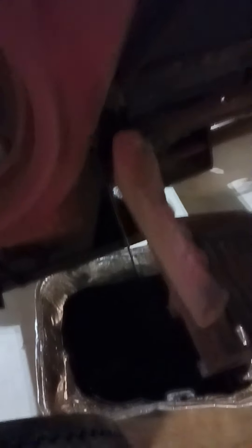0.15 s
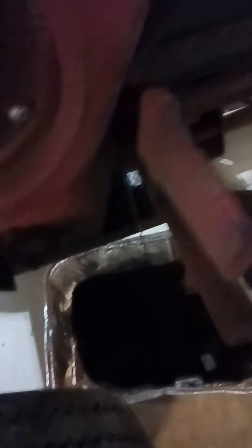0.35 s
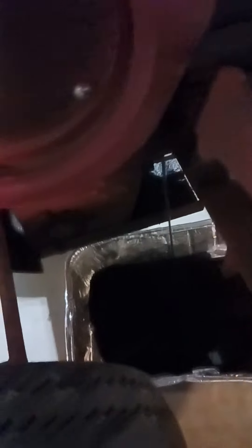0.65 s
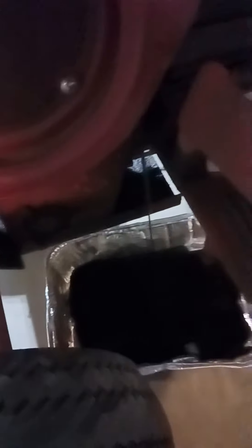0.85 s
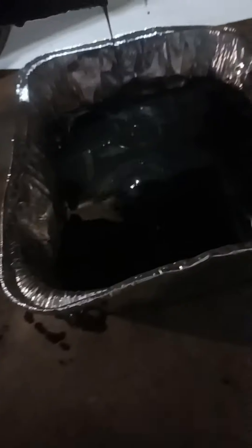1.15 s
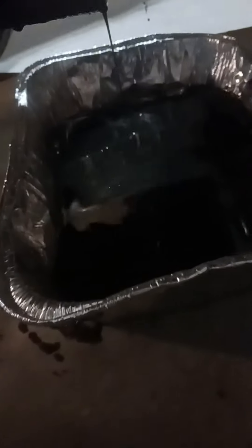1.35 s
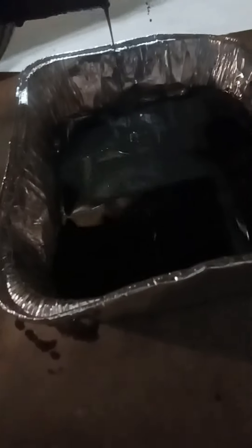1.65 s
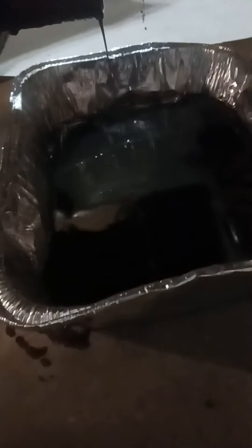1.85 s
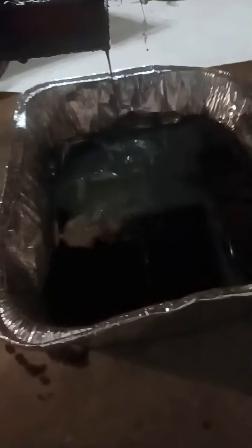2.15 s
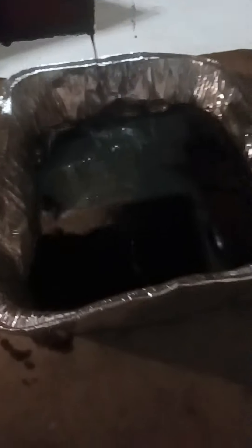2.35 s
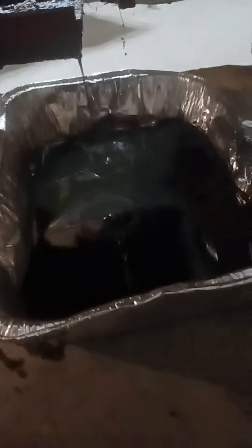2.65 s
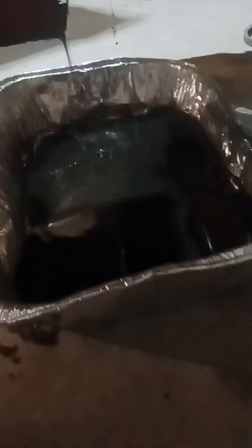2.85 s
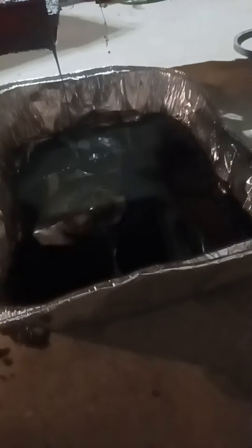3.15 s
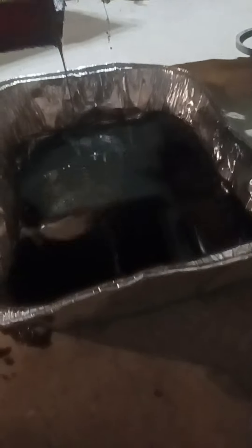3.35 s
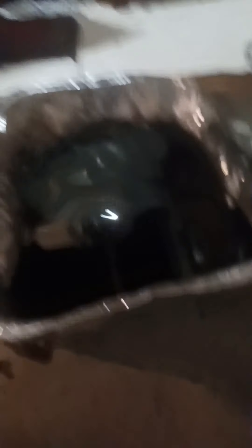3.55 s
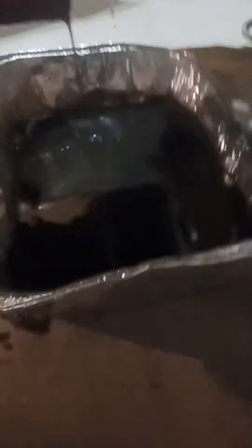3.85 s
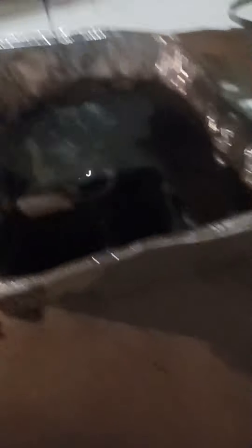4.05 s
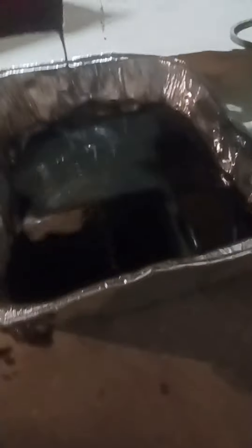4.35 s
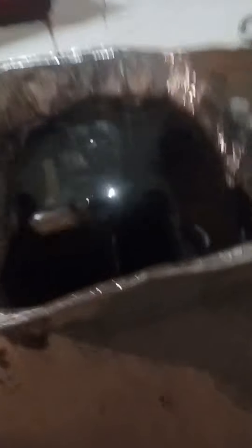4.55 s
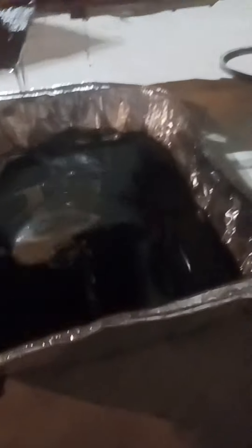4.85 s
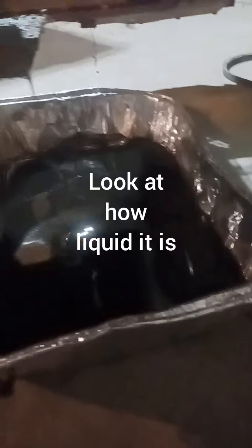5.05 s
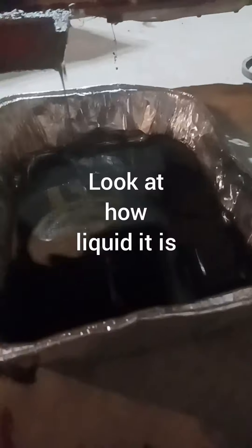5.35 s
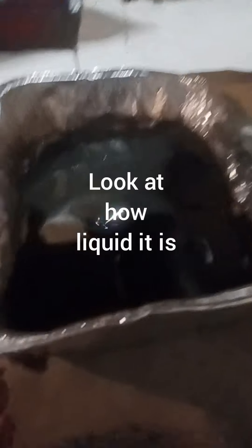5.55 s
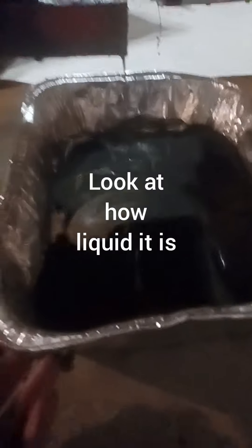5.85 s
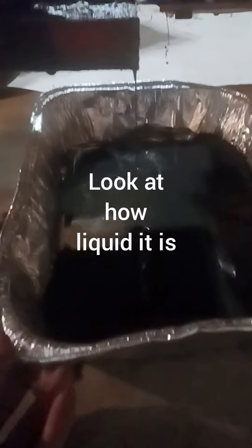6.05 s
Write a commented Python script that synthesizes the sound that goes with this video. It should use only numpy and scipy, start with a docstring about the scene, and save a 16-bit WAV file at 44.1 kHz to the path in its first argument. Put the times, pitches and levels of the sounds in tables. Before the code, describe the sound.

Still room air with blurred drips and finger knocks lasts about a second and cuts to silence. Then a thin oil stream patters into a shallow metal pan, close and fairly dry, with irregular plops, tiny whistling bubbles, snapping films and brief gurgles. Muffled engines drone outside, the second sinking lower. Grainy cloth rustles and dull thumps interrupt mostly around the middle.

```python
"""A quieter first second, farther from the pan: still air, blurred plops, knocks and taps; then a short silence.
Then engine oil trickles from a car into a foil pan on a garage floor: noise and bubbles ring pan resonances.
Plops, chirps and gurgles are rising-pitch bubbles; bursting films are noise cracks with a very high ring.
Two far engines hum through the walls in turn, as sums of shaft orders, over a filtered-noise rumble.
From 1.6 s a hand and sleeve rub close to the microphone: grainy noise shaped stroke by stroke."""
import sys
import numpy as np
from scipy import signal
from scipy.fft import rfft, irfft, next_fast_len
from scipy.io import wavfile
from scipy.ndimage import uniform_filter1d, map_coordinates

SR = 44100
rng = np.random.default_rng(int(sys.argv[2]) if len(sys.argv) > 2 else 0)


def file_out(sig):
    """Save sig as 16-bit WAV at sys.argv[1]."""
    # one column per channel
    cols = np.atleast_2d(sig).T
    # limit, then scale
    lim = np.clip(cols, -1, 1)
    pcm = np.round(lim * 32767).astype(np.int16)
    wavfile.write(sys.argv[1], SR, pcm)


N = 274302  # samples


def amp(db):
    """Decibels to gain."""
    return 10 ** (np.asarray(db) / 20)


def unit(x):
    """Scale to rms 1."""
    return x / np.sqrt(np.mean(x ** 2) + 1e-20)


def crest(x):
    """Scale to peak 1."""
    return x / np.abs(x).max()


def along(points, hz):
    """Interpolate (Hz, value) points on a log frequency axis."""
    f, v = np.transpose(points)
    return np.interp(np.log(hz + 1), np.log(f + 1), v)


def clock():
    """Time axis of the whole sound, s."""
    return np.arange(N) / SR


def moment():
    """Time axis of one short event, s."""
    return np.arange(SR // 6) / SR


def curve(rows):
    """(s, value) breakpoints to one value per sample."""
    s, value = np.transpose(rows)
    return np.interp(clock(), s, value)


def wobble(knots_per_s):
    """Smooth random curve through normal-distributed knots."""
    return map_coordinates(rng.standard_normal(4096), [np.arange(N) * knots_per_s / SR], mode="wrap")


def filtered(x, response):
    """Apply a complex frequency response, zero-padded."""
    m = next_fast_len(len(x) + 4096)
    spectrum = rfft(x, m) * response(np.fft.rfftfreq(m, 1 / SR))
    return irfft(spectrum, m)[:len(x)]


def coloured(x, spectrum):
    """Filter x by a (Hz, dB) spectrum."""
    return filtered(x, lambda hz: amp(along(spectrum, hz)))


def noise(spectrum):
    """Coloured noise of rms 1."""
    return unit(coloured(rng.standard_normal(N), spectrum))


def burst(t60_s):
    """White noise with exponential decay."""
    t = moment()
    return rng.standard_normal(len(t)) * amp(-60 * t / t60_s)


def add(track, s, sound):
    """Mix a sound in at time s."""
    room = track[max(round(s * SR), 0):][:len(sound)]
    room += sound[:len(room)]


# room and microphone hiss: f/Hz, relative level/dB
AIR_SPECTRUM = [(25, -11), (80, 2.5), (130, -8.5), (380, -24), (530, -12), (730, -7.5), (900, -23),
                (1250, -15), (1500, -26), (4600, -31), (5300, -11.5), (6100, -28.5), (11000, -36),
                (13000, -25.5)]


def air():
    """Steady coloured noise of the still room and the microphone."""
    return amp(-71) * noise(AIR_SPECTRUM)


# resonances of the foil pan with its pool: f/Hz, width/Hz, level/dB
PAN_MODES = [(1082, 90, -4.5), (1628, 42, -4), (1864, 750, -21.5), (2222, 30, 3.5), (2421, 20, -2.5),
             (2830, 160, -3.5), (5190, 780, -16)]


def pan(x):
    """Ring the pan: parallel second-order resonances of alternating sign."""
    def response(f):
        total = 0
        for k, (centre_hz, width_hz, db) in enumerate(PAN_MODES):
            damping = 1j * f * width_hz
            total = total + (-1) ** k * amp(db) * damping / (centre_hz ** 2 - f ** 2 + damping)
        return total
    return filtered(x, response)


# distant plops: t/s, peak level/dB
FAR_PLOPS_HEARD = [(0.141, -58), (0.519, -55.5), (0.739, -58), (0.811, -50.5)]
# bright colour of splash, fizz and cloth: f/Hz, relative level/dB
SWISH_SPECTRUM = [(400, -28.5), (1200, 4.5), (2500, 7), (4000, 8.5), (7300, 7), (9000, -12.5), (12500, 0),
                  (15500, 1.5)]


def far_plops():
    """Plops blurred by the room: noise with a soft onset, part of it ringing the pan."""
    out, t = np.zeros(N), moment()
    for s, db in FAR_PLOPS_HEARD:
        wash = burst(t60_s=0.2) * (1 - np.exp(-t / 0.0063)) ** 2
        mixed = crest(wash) + crest(pan(wash))
        add(out, s, amp(db) * crest(coloured(mixed, SWISH_SPECTRUM)))
    return out


def bubble(hz, life_s, rise):
    """An air pocket swells and fades; with rise > 0 its pitch climbs as it nears the surface."""
    u = moment() / life_s
    pitch_hz = hz * (1 + rise * (np.minimum(u, 4) - 1))
    return u * np.exp(1 - u) * np.sin(2 * np.pi * np.cumsum(pitch_hz) / SR)


# dull blows on the camera body: t/s, peak level/dB, f/Hz, t60/s
BODY_BUMPS = [(0.7232, -39, 487, 0.0098), (0.849, -42.5, 190, 0.0069), (1.59, -45, 354, 0.013),
              (1.8, -42.5, 383, 0.011), (3.656, -38.5, 66.4, 0.053), (4.386, -32, 51, 0.13)]
# hard finger taps: t/s, peak level/dB
FINGER_TAPS = [(0.7202, -29), (0.8479, -47)]


def knocks():
    """Fingers on the camera body: bumps are damped sines, taps are noise clicks with a tiny ring."""
    out, t = np.zeros(N), moment()
    for s, db, hz, t60_s in BODY_BUMPS:
        envelope = amp(-60 * t / t60_s) * (1 - np.exp(-2 * hz * t))
        add(out, s, amp(db) * crest(np.sin(2 * np.pi * hz * t) * envelope))
    for s, db in FINGER_TAPS:
        click = burst(t60_s=0.0075) + 2 * bubble(4660, life_s=0.000088, rise=0)
        add(out, s, amp(db) * crest(click))
    return out


# garage booms: f/Hz, width/Hz, lift/dB
BOOM_MODES = [(161, 6, 9), (198, 5, 10)]
DIP_S, DIP_WIDTH_S, DIP_DB = 2.15, 0.2, 20  # lowest note dips briefly


def engine(speed, orders, db, rev_db_per_oct):
    """Shaft orders heard through walls: the lowest follows speed, the rest waver, the garage booms."""
    shaft_hz = curve(speed)
    t = clock()
    running = (t > speed[0][0]) & (t < speed[-1][0])
    heard = uniform_filter1d(1. * running, size=2000)
    phase = 2 * np.pi * np.cumsum(shaft_hz * (1 + 0.003 * wobble(7))) / SR
    dip = np.exp(-((t - DIP_S) / DIP_WIDTH_S) ** 2)
    octaves = np.log2(shaft_hz / np.mean(speed, axis=0)[1])
    lowest_db = -DIP_DB * dip + rev_db_per_oct * octaves
    hum = np.zeros(N)
    for order, order_db in orders:
        boom_db = np.zeros(N)
        for hz, width_hz, lift_db in BOOM_MODES:
            boom_db += lift_db * np.exp(-((order * shaft_hz - hz) / width_hz) ** 2)
        motion_db = 3.7 * wobble(2.856) if order > orders[0][0] else lowest_db
        gain = amp(db + order_db + boom_db + motion_db)
        hum += np.sqrt(2) * gain * np.sin(order * phase + rng.uniform(0, 2 * np.pi))
    return heard * hum


# engine speeds: t/s, shaft f/Hz
FIRST_SPEED = [(1.2, 32), (1.75, 32.4), (2.45, 34.3), (3.1, 34.6), (3.5, 26.6)]
SECOND_SPEED = [(3.8, 25.5), (4.55, 22.1), (5.5, 17.7), (5.9, 15.9), (6.22, 18)]
# exhaust notes: multiple of shaft f, relative level/dB
FIRST_ORDERS = [(2, -1.5), (3, -12), (4, -20.5), (5, -13.5), (6, -20.5), (7, -15.5), (10, -19.5), (20, -32)]
SECOND_ORDERS = [(3, 1.5), (4, -4), (5, -3), (8, -14.5)]
# rumble colour: f/Hz, relative level/dB
RUMBLE_SPECTRUM = [(25, -13), (55, -2), (110, -3.5), (320, -12), (1100, -40)]
# rumble level: t/s, level/dB
TRAFFIC_LEVEL = [(1.2, -62), (3.1, -60), (4.4, -56), (5.0, -63.5), (5.85, -62.5), (6.0, -55)]


def street():
    """Two engines in turn over low coloured noise of traffic, after the break."""
    heard = clock() > BREAK_GATE[2][0]
    rumble = heard * noise(RUMBLE_SPECTRUM) * amp(curve(TRAFFIC_LEVEL))
    first = engine(FIRST_SPEED, FIRST_ORDERS, db=-52, rev_db_per_oct=20)
    second = engine(SECOND_SPEED, SECOND_ORDERS, db=-57, rev_db_per_oct=-11)
    return first + second + rumble


# reverberation: f/Hz, t60/s
GARAGE_DECAY = [(2300, 0.1), (6000, 0.05), (14000, 0.033)]


def echoed(x, wet_db):
    """Add a fresh tail from the floor and the car's underside; treble dies sooner."""
    hz, t, z = signal.stft(rng.standard_normal(SR // 6), SR, nperseg=128)
    decay = amp(-60 * t / along(GARAGE_DECAY, hz)[:, None])
    tail = signal.istft(z * decay, SR, nperseg=128)[1]
    wet = signal.fftconvolve(x, tail / np.linalg.norm(tail))[:len(x)]
    return x + amp(wet_db) * wet


# trickle: t/s, level/dB
FLOW_LEVEL = [(1.2, -61.5), (2.15, -65.5), (2.6, -60), (4.7, -59.5), (5.1, -64.5), (5.45, -59), (5.83, -65),
              (6.05, -57.5)]


def trickle(count=520):
    """The thin stream keeps the pan murmuring and sheds faint bubbles at random; some burst, a few whistle."""
    t = clock()
    murmur = unit(pan(rng.standard_normal(N))) * amp(4 * wobble(50) - 10)
    fizz = noise(SWISH_SPECTRUM) * amp(-11.5 + wobble(25))
    small, films = np.zeros(N), np.zeros(N)
    for k, (when, size, pitch, film) in enumerate(rng.uniform(-1, 1, (count, 4))):
        s = np.interp(k, [0, count], [FLOW_LEVEL[0][0], t[-1]]) + .03 * when
        pocket = bubble(2350 * amp(3 * pitch * abs(pitch)), life_s=.0013, rise=.03)
        add(small, s, amp(8 * size - 1) * echoed(pocket, wet_db=0))
        if film > .7:
            add(films, s, amp(16 + 7.8 * size) * snap())
        if film < -.9:
            add(films, s, amp(6 + 4 * size) * chirp(4300 * amp(3 * pitch)))
    bubbles = amp(2) * (.8 * small + pan(small))  # they ring the pan too
    heard = t > BREAK_GATE[2][0]
    return heard * amp(curve(FLOW_LEVEL)) * (murmur + fizz + bubbles + films)


PLOP_LIFE_S, SPLASH_DB, SPRAY_GAIN = .0026, -1, .75  # spray misses the pan


def plop(hz):
    """An air pocket rings under a short splash that shakes the pan."""
    strike = burst(t60_s=0.02)
    splash = crest(pan(strike)) + SPRAY_GAIN * crest(coloured(strike, SWISH_SPECTRUM))
    pocket = bubble(hz, life_s=PLOP_LIFE_S, rise=0.031)
    return crest(echoed(pocket + amp(SPLASH_DB) * splash, wet_db=0))


# loudest drops: t/s, plop level/dB, f/Hz
POOL_PLOPS = [(1.246, -43.5, 2500), (1.265, -46, 2440), (1.321, -42, 2344), (1.351, -47.5, 2160),
              (1.418, -36.5, 2367), (1.455, -36, 2360), (2.4671, -41.5, 2415), (2.5202, -36.5, 2640),
              (2.577, -44, 2165), (2.645, -44.5, 3004), (2.779, -38.5, 2380), (2.842, -42.5, 2274),
              (3.099, -50, 2430), (3.1465, -45.5, 2200), (3.3008, -40, 2255), (3.786, -43.5, 2420),
              (4.232, -38, 2420), (4.364, -40.5, 2306), (4.629, -45.5, 2490), (4.7191, -46, 2300),
              (4.8194, -46, 2406), (4.884, -44, 2160), (4.9096, -41.5, 2480), (5.192, -41.5, 2310),
              (5.2833, -46, 2526), (5.652, -48.5, 2420), (5.776, -51.5, 2160), (5.7233, -45.5, 2165),
              (5.914, -46, 2370), (5.948, -37, 2337), (6.0176, -48, 2340), (6.175, -47.5, 2840)]


def plops():
    """Each drop plops into the pool and snaps a film."""
    out = np.zeros(N)
    film_db = -8.5  # re plop
    for s, db, hz in POOL_PLOPS:
        add(out, s, amp(db) * (plop(hz) + amp(film_db) * snap()))
    return out


def chirp(hz):
    """A small bubble swells for a few cycles and whistles upward."""
    return crest(echoed(bubble(hz, life_s=6 / hz, rise=.14), wet_db=-1))


# whistling bubbles: t/s, whistle level/dB, f/Hz
BUBBLE_CHIRPS = [(1.264, -43.5, 4150), (1.277, -46, 3580), (1.347, -48.5, 5340), (1.648, -42, 4760),
                 (2.156, -48, 5400), (2.333, -40.5, 5370), (2.776, -44.5, 6940), (3.067, -41.5, 5740),
                 (4.454, -41, 6440), (4.718, -45.5, 7150), (5.377, -43.5, 6900), (5.407, -43.5, 6250),
                 (5.429, -47.5, 7340), (5.454, -46, 6700), (5.745, -44.5, 6400), (6.101, -44.5, 4970)]


def chirps():
    """Each small bubble whistles as its film bursts."""
    out = np.zeros(N)
    burst_db = 4.5  # re whistle
    for s, db, hz in BUBBLE_CHIRPS:
        add(out, s, amp(db) * (chirp(hz) + amp(burst_db) * snap()))
    return out


# crack colour: f/Hz, relative level/dB
CRACK_SPECTRUM = [(1500, -8.5), (4000, -40), (6700, 7), (9000, -7), (12500, 12.5), (15500, 6.5)]
RIM_LOW_HZ, RIM_HIGH_HZ, RIM_DB = 11000, 15300, -8  # rim level re crack


def snap():
    """A film breaks with a noise crack; its collapsing rim rings very high."""
    crack = crest(coloured(burst(t60_s=.007), CRACK_SPECTRUM))
    rim = bubble(rng.uniform(RIM_LOW_HZ, RIM_HIGH_HZ), life_s=.0004, rise=0)
    return crest(echoed(crack + amp(RIM_DB) * rim, wet_db=-4))


# loudest film breaks: t/s, peak level/dB
FILM_SNAPS = [(1.453, -30.5), (1.802, -43.5), (1.863, -41), (1.981, -40.5), (2.546, -44), (2.616, -38.5),
              (2.638, -32.5), (2.840, -39.5), (2.885, -37.5), (3.0181, -38.5), (3.182, -30), (4.253, -32.5),
              (4.7643, -39), (4.92, -36.5), (5.2858, -39.5), (5.8335, -35.5), (5.971, -32), (6.052, -34)]
AFTER_MEAN_S, AFTER_DB = 0.023, -13  # second film: mean wait, level re first


def snaps():
    """A film breaks, then a neighbouring one gives way more weakly."""
    out = np.zeros(N)
    for s, db in FILM_SNAPS:
        add(out, s, amp(db) * snap())
        wait_s = AFTER_MEAN_S * (.5 + rng.random())
        add(out, s + wait_s, amp(db + AFTER_DB) * snap())
    return out


# large air pockets folded under by the stream: t/s, peak level/dB, centre f/Hz
POCKET_GURGLES = [(1.462, -48, 1820), (1.958, -47, 1610), (2.317, -48, 1620), (2.474, -52.5, 1640),
                  (2.966, -54.5, 1710), (4.503, -41.5, 2375), (5.052, -47, 1780), (5.444, -49.5, 1630),
                  (5.867, -44, 1740)]
GURGLE_S, GURGLE_FADE_DB, GURGLE_SPREAD_OCT = .04, 9, .24


def gurgles(count=12):
    """Each large pocket splits into a quick, fading run of overlapping bubbles."""
    out = np.zeros(N)
    for s, db, hz in POCKET_GURGLES:
        run = np.zeros(len(moment()))
        for k, (late, pitch, size) in enumerate(rng.uniform(-1.027, 1, (count, 3))):
            u = (k + .5 + late / 2) / count  # place in the run
            scatter_oct = 2 * GURGLE_SPREAD_OCT * pitch * abs(pitch)
            pocket = bubble(hz * 2 ** scatter_oct, life_s=.001, rise=.03)
            add(run, u * GURGLE_S, amp(2 * size - GURGLE_FADE_DB * u) * pocket)
        add(out, s, amp(db) * crest(echoed(run, wet_db=-3)))
    return out


# sleeve strokes: start t/s, end t/s, rub level/dB, swish level/dB
SLEEVE_STROKES = [(1.56, 1.892, -78.5, -63), (3.363, 3.481, -69, -57), (3.459, 3.609, -45.5, -52.5),
                  (3.607, 3.656, -36, -43), (3.798, 3.894, -59, -59.5), (3.953, 4.015, -51, -52.5),
                  (4.031, 4.072, -53, -65), (4.085, 4.122, -50, -46.5), (4.12, 4.204, -91, -57),
                  (4.349, 4.382, -55.5, -61), (4.452, 4.533, -53.5, -58), (4.548, 4.603, -58.5, -67)]
# hand catching on the camera body: t/s, rub level/dB, swish level/dB
HAND_CATCHES = [(3.4579, -33, -48), (3.471, -34, -70), (3.997, -47, -37.5), (4.463, -45.5, -56),
                (4.559, -39.5, -69)]
# rub colour: f/Hz, relative level/dB
RUB_SPECTRUM = [(30, -25), (280, 5), (830, 5), (1100, -4.5), (1800, -2.5), (3500, -9), (8000, -49)]
# sleeve creases giving way: f/Hz, relative level/dB
CRINKLE_SPECTRUM = [(600, -61), (2600, 10), (7500, 7), (10000, -3.5)]
GRIP_S, SWELL_DB, RELEASE_S, CATCH_S = 0.0066, 0.5, 0.0047, 0.0012
TAIL_DB, TAIL_S = -11.5, 0.062  # slow faint room tail after each stroke
RUB_GRAIN_DB, SWISH_GRAIN_DB = 1.5, 2.8  # cloth roughness
CRINKLES_PER_S, CRINKLE_DB = 260, -6  # level re swish noise before its grain


def handling():
    """Cloth grips, swells and lets go: grainy rub on the body, swish in the air, crinkling creases."""
    t = clock()
    rub, swish = np.zeros(N), np.zeros(N)
    flutter_db = 1.6 * wobble(70)
    for start, end, rub_db, swish_db in SLEEVE_STROKES:
        grip = 1 - np.exp(-np.maximum(t - start, 0) / GRIP_S)
        after = np.maximum(t - end, 0)
        room_tail = amp(TAIL_DB) * np.exp(-after / TAIL_S)
        release = np.maximum(np.exp(-after / RELEASE_S), room_tail)
        swell_db = np.interp(t, [start, end], [-SWELL_DB, 0])
        envelope = grip * amp(swell_db + flutter_db) * release
        rub += amp(rub_db) * envelope
        swish += amp(swish_db) * envelope
    for s, rub_db, swish_db in HAND_CATCHES:
        jerk = np.exp(-np.abs(t - s) / CATCH_S)
        rub += amp(rub_db) * jerk
        swish += amp(swish_db) * jerk
    creases = (rng.random(N) < CRINKLES_PER_S / SR) * rng.uniform(-0.87, 1, N)
    crackle = signal.fftconvolve(creases, burst(t60_s=.006))[:N]
    crinkle = amp(CRINKLE_DB) * unit(coloured(crackle, CRINKLE_SPECTRUM))
    cloth = noise(SWISH_SPECTRUM) * amp(SWISH_GRAIN_DB * wobble(220)) + crinkle
    body = noise(RUB_SPECTRUM) * amp(RUB_GRAIN_DB * wobble(82))
    return rub * body + swish * cloth


def scene():
    """Still air, knocks, street, oil and handling."""
    oil = far_plops() + trickle() + plops() + chirps() + snaps() + gurgles()
    return (air() + knocks() + street() + oil + handling())[None]


# short silence: t/s, gain
BREAK_GATE = [(0.960, 1), (0.966, 0), (1.185, 0), (1.23, 1)]
TOP_HZ = 15750


def record(dry):
    """The sound breaks off briefly; nothing is kept above the band limit."""
    gated = dry[0] * curve(BREAK_GATE)
    return filtered(gated, lambda hz: hz < TOP_HZ)[None]


dry = scene()
out = record(dry)
file_out(out)
```